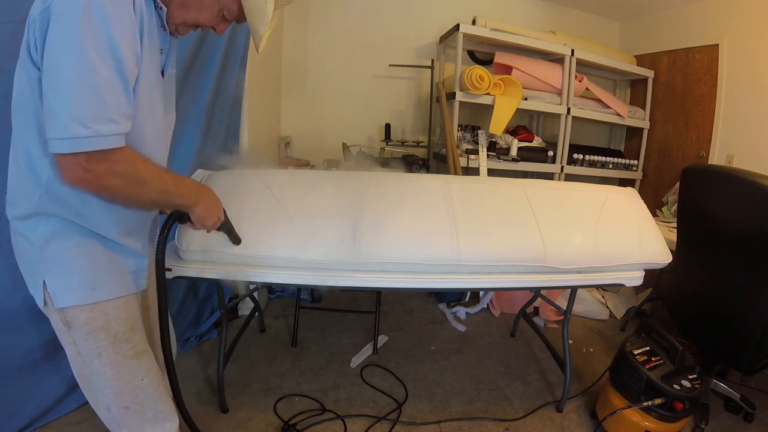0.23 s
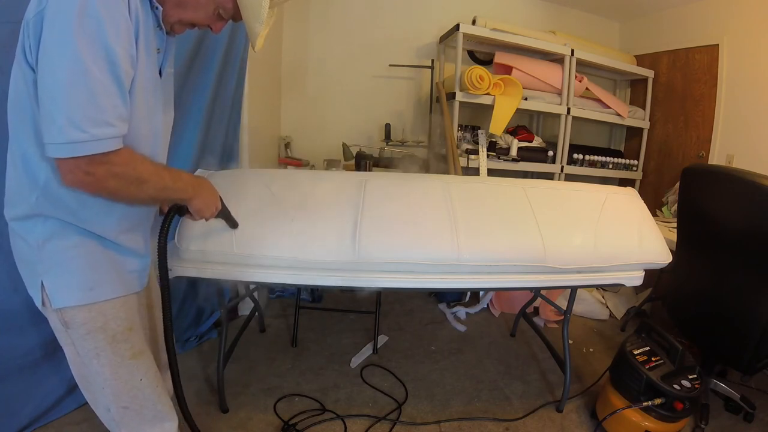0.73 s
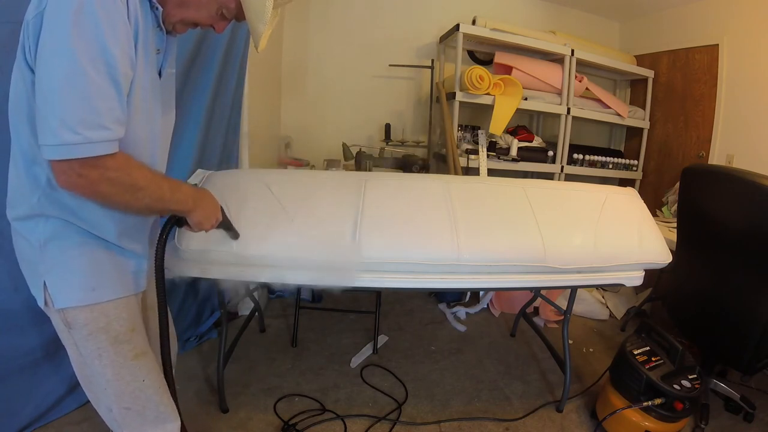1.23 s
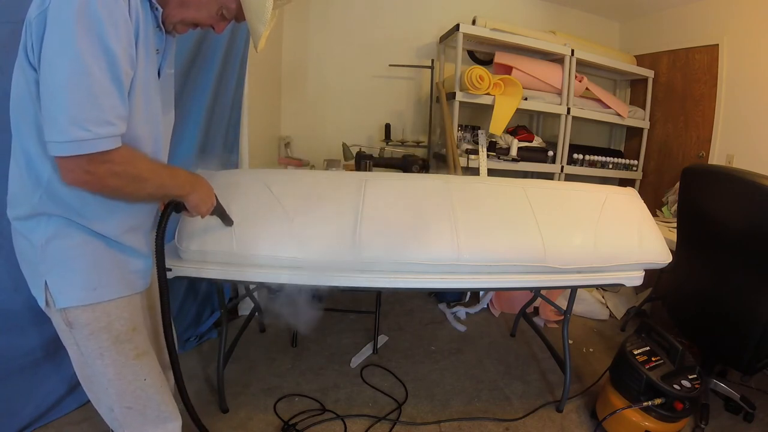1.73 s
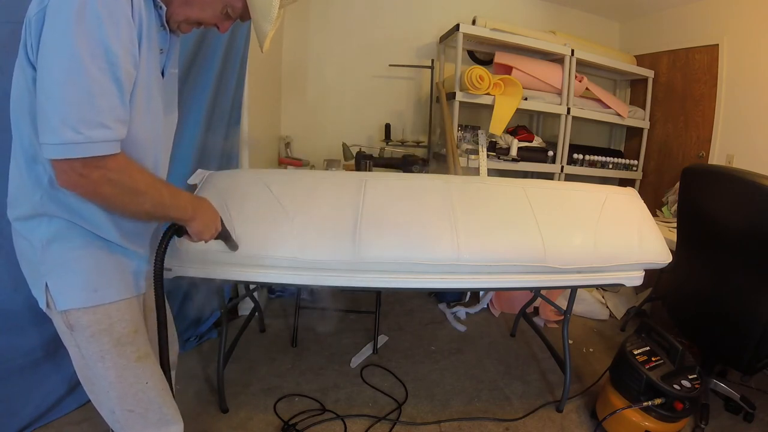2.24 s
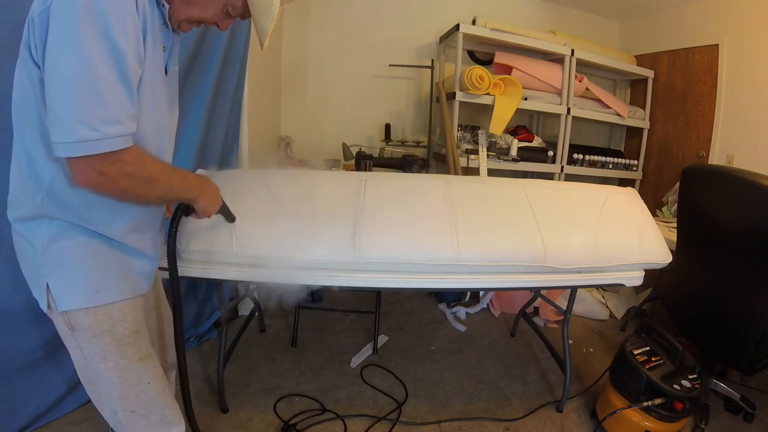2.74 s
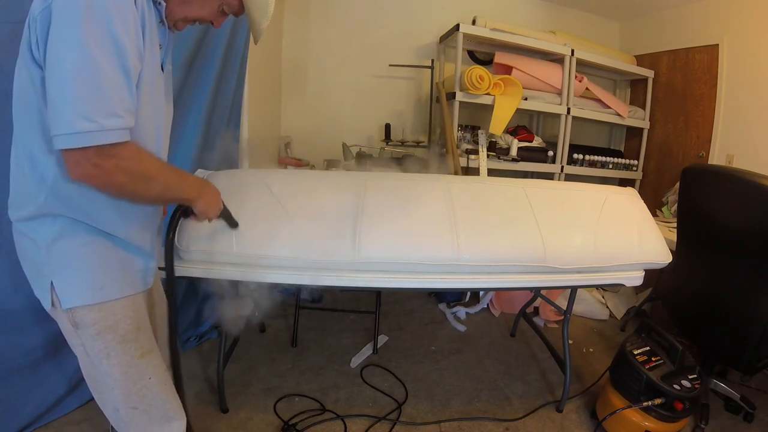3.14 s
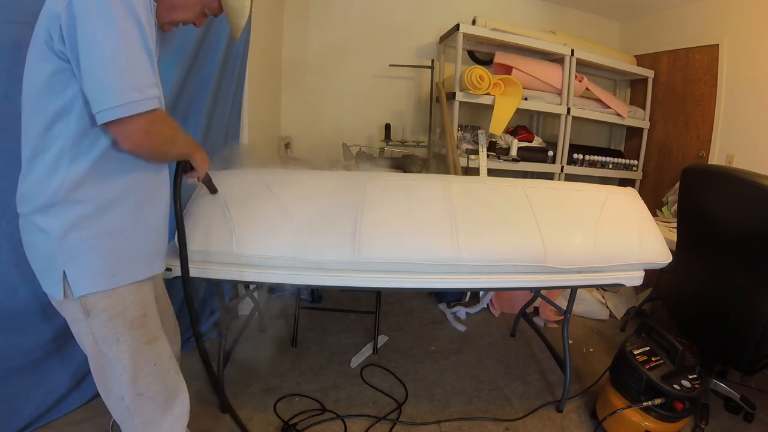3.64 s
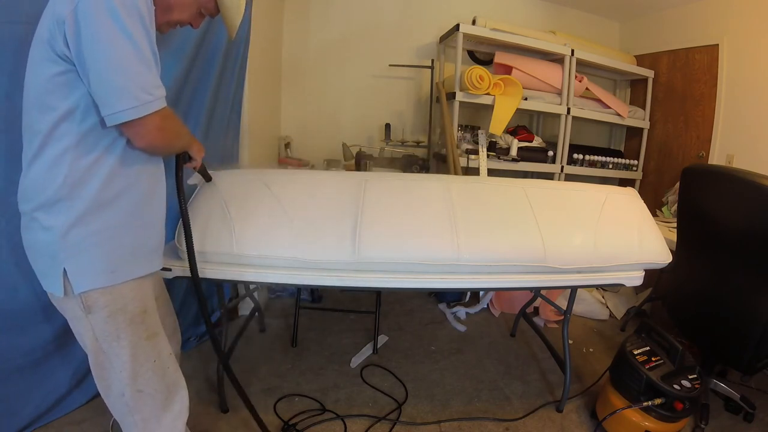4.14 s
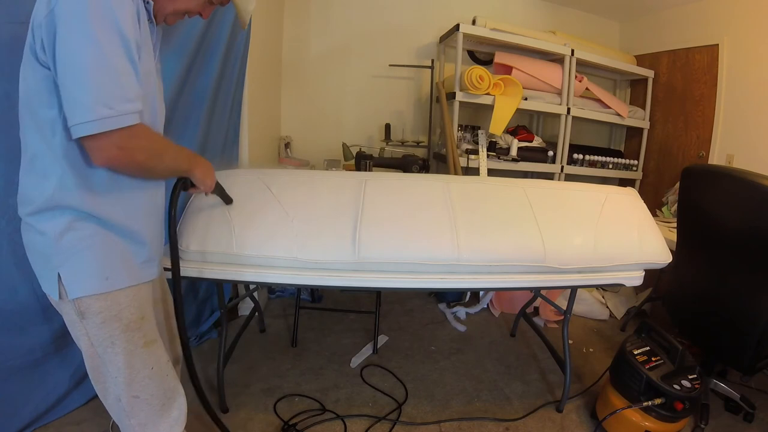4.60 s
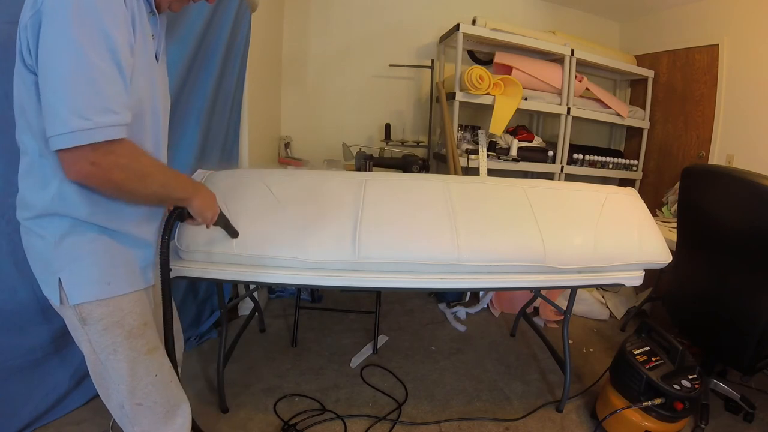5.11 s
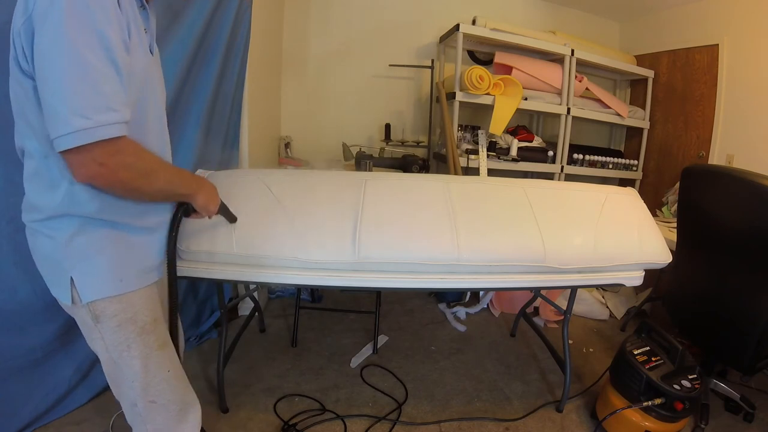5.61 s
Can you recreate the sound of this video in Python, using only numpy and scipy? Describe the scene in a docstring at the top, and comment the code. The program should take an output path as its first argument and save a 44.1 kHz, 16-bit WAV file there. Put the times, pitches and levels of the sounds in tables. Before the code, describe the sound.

A handheld steam wand hisses over a vinyl cushion for the whole six seconds. The hiss is bright and fizzy, with a breathy, whistle-like ring that wavers slightly in pitch as the nozzle tilts. It swells and sinks a few times a second as the hand moves. Short, hollow puffs of spray mark the jet striking squarely, clearest around 0.1, 0.8, 1.4, 2.6, 2.9 and 3.2 seconds. The steam dips briefly near 0.3, 0.6 and 2 seconds. From about 4 to 4.9 seconds it is softer, with a thin sizzle, then surges with another puff at 5.1, dips at 5.4 and rises again at the end. A low room rumble and a faint, wavering machine hum lie underneath throughout. The sound is mono, from one microphone in a small workshop with very short echoes.

```python
"""A steam wand sweeps over a vinyl cushion in a small workshop, heard by one microphone.
The turbulent jet hisses, rings in the gap between nozzle and vinyl, and roars where it strikes;
all three shift as the hand moves. Nearby surfaces send short echoes to the microphone,
and behind the steam lie the low rumble of the room and the hum of a machine."""
import sys
import numpy as np
from scipy import signal
from scipy.fft import rfft, irfft
from scipy.io import wavfile
from scipy.ndimage import uniform_filter1d

SR = 44100
rng = np.random.default_rng(int(sys.argv[2]) if len(sys.argv) > 2 else 0)


def master(y):
    """Save y as 16-bit WAV."""
    cut = np.clip(np.atleast_2d(y).T, -1, 1)
    pcm = np.round(cut * 32767)  # scale
    wavfile.write(sys.argv[1], SR, pcm.astype(np.int16))


N = 258558
SIZE, HOP = 512, 128  # samples in a frame, and between frames
HZ = np.fft.rfftfreq(SIZE, 1 / SR)
FRAME_S = np.arange(N // HOP + 5) * HOP / SR

# room tone at the microphone: f/Hz, relative level/dB
RUMBLE_COLOUR = [(10, -3.5), (25, -1), (45, -2), (65, -7), (120, -13.5), (250, -14), (600, -22),
                 (2000, -43), (12000, -29.5)]
# a machine humming in the background: t/s, relative level/dB
HUM_LEVEL = [(0.0, -48.5), (0.26, -61), (0.31, -44.5), (0.65, -58.5), (1.08, -48), (1.57, -58.5),
             (2.12, -49.5), (2.19, -57.5), (3.87, -48), (4.39, -59), (4.65, -49.5), (5.48, -56.5),
             (5.52, -52), (5.86, -57)]
# echoes off nearby surfaces: delay/s, gain against the direct sound
ECHOES = [(.00093, 0.056), (.0034, 0.1), (.0067, 0.093), (.0094, 0.056), (.0100, 0.065), (0.0145, 0.038)]
# the jet swells and sinks as the wand is rubbed to and fro: t/s, flow/dB, gap ring/dB
WAND_STROKES = [(0.0, -29.5, -24.5), (0.16, -29, -28.5), (0.24, -30.5, -37), (0.33, -40.5, -39.5),
                (0.39, -34, -30), (0.47, -28, -29.5), (0.5, -34, -29.5), (0.55, -31, -30),
                (0.65, -40.5, -40.5), (0.68, -39, -38), (0.73, -32.5, -25), (0.86, -27.5, -28),
                (0.98, -32, -34), (1.03, -39.5, -40), (1.08, -33.5, -29.5), (1.21, -35, -34),
                (1.29, -32, -28), (1.34, -35.5, -33), (1.42, -28.5, -32), (1.47, -29.5, -33),
                (1.52, -25.5, -28.5), (1.6, -35.5, -33), (1.65, -33, -27.5), (1.71, -32, -33),
                (1.88, -32.5, -28.5), (1.99, -39.5, -48), (2.09, -45, -49), (2.12, -38, -36),
                (2.17, -37, -35.5), (2.22, -41.5, -47), (2.28, -41, -47), (2.33, -35.5, -35),
                (2.45, -29, -27.5), (2.55, -32.5, -32), (2.69, -27.5, -28), (2.81, -34, -29.5),
                (2.99, -29.5, -31), (3.05, -40.5, -45), (3.1, -35.5, -30), (3.15, -34.5, -40),
                (3.26, -26.5, -28), (3.38, -33.5, -28), (3.43, -30.5, -33), (3.49, -36.5, -32),
                (3.74, -32, -30.5), (3.83, -34, -34.5), (3.93, -39, -34.5), (3.98, -35.5, -33),
                (4.11, -38, -40.5), (4.29, -40.5, -36), (4.96, -39, -31), (5.07, -31, -26.5),
                (5.19, -33, -32.5), (5.27, -35, -28.5), (5.3, -37, -33.5), (5.45, -39.5, -40),
                (5.58, -36.5, -27.5), (5.66, -37, -31), (5.81, -31, -27), (5.86, -33.5, -28)]
# pitch of the gap, which falls as the nozzle tilts away from the vinyl: t/s, f/Hz
GAP_PITCH = [(0.0, 3120), (0.15, 2950), (0.23, 3240), (0.85, 3060), (0.93, 3270), (1.84, 3020),
             (2.02, 3270), (3.34, 3120), (3.48, 2860), (4.11, 3350), (4.62, 3200), (4.9, 2830),
             (4.99, 3100), (5.17, 2960), (5.24, 3320), (5.43, 3300), (5.56, 3020), (5.86, 3040)]
# how well the nozzle radiates the gap ring: f/Hz, gain/dB
NOZZLE_RESPONSE = [(2000, -3.5), (3000, 0), (3550, 0.5), (3800, -0.5), (4500, 1)]
# spectra of the steam's hiss, top fizz, spray and low puff: f/Hz, relative level/dB
HISS_COLOUR = [(1500, -23), (2600, -7), (4100, 1), (4700, 0.5), (5500, -.5), (6500, -3.5), (7500, -2.5),
               (9000, -4.5), (10500, -8), (13000, -23.5)]
FIZZ_COLOUR = [(6000, -19), (9000, -4), (10500, 0.5), (12000, -0.5), (13200, -11), (15000, -15),
               (16000, -2.5)]
SPRAY_COLOUR = [(700, -67), (1300, -1), (1700, -5), (2050, -3), (2400, 0), (2700, 3), (3300, -12),
                (5000, -35)]
PUFF_COLOUR = [(60, -43), (170, -4), (330, -5.5), (450, 2), (580, 3.5), (750, -3.5), (1100, -8.5),
               (2000, -12)]
# top fizz and thin sizzle against the rest of the jet: t/s, gain/dB
FIZZ_LIFT = [(0.0, 1), (0.78, -2), (0.96, 2.5), (1.35, -0.5), (1.48, 5.5), (1.6, -9), (1.86, -2), (2.05, 8),
             (2.22, -5), (2.36, 1.5), (2.58, -1.5), (2.67, 2), (2.818, 0), (4.85, 0), (5.07, 2), (5.4, 2),
             (5.61, 0), (5.86, 5.5)]
SIZZLE_LIFT = [(0.0, 2), (0.36, -5.0), (0.84, -0.5), (2.61, -12), (2.67, 0.5), (3.0, -1), (3.09, -10.5),
               (3.301, 1.5), (3.96, 5.5), (4.44, 9.5), (5.22, 0.5), (5.4, 9), (5.612, -1), (5.86, 2)]
# how each named part follows the wand:
# base level/dB, slope with flow/(dB/dB), with ring/(dB/dB), with fall of gap pitch/(dB/kHz)
PART_RESPONSE = {"hiss": (-36, 1.0, 0.01, 1.5), "fizz": (-41.5, 1.29, 0.09, -8),
                 "sizzle": (-43.5, 1.35, 0.34, 0), "spray": (-41, 0.32, 0.28, 9.5),
                 "roar": (-43.5, -0.02, 0.4, 5.5), "puff": (-47, 0.75, -0.34, -7)}
# the jet hits the cushion squarely: t/s, length/s, roar/dB, puff/dB, spray/dB
BLASTS = [(0.097, 0.059, -38.5, -36, -45), (0.213, 0.053, -40.5, -34.5, -50), (0.508, 0.027, -41, -41, -40),
          (0.715, 0.012, -37, -46, -35), (0.829, 0.082, -36, -37.5, -33), (1.1, 0.15, -41, -70, -44),
          (1.388, 0.055, -35, -36.5, -35.5), (1.625, 0.03, -37.5, -42, -46), (1.729, 0.17, -38.5, -54, -39),
          (2.107, 0.053, -47, -47, -42), (2.33, 0.093, -42.5, -59, -42), (2.586, 0.085, -41.5, -43, -33.5),
          (2.912, 0.098, -40.5, -37.5, -37.5), (3.183, 0.04, -31.5, -33.5, -35),
          (3.532, 0.07, -61, -45, -36), (5.084, 0.043, -34, -34.5, -40)]
# the nozzle presses into the vinyl: t/s, length/s, gain/dB
CHOKES = [(0.607, 0.082, -6), (1.98, 0.09, -0.5), (4.046, 0.27, -3), (5.388, 0.074, -2.5)]
# the wand held upright at its usual strength
USUAL_FLOW_DB, USUAL_RING_DB, UPRIGHT_HZ = -34.5, -33, 3190


def gain_of(db):
    """Decibels to amplitude."""
    return 10 ** (np.asarray(db) / 20)


def unit_rms(x):
    """Scales to rms 1."""
    return x / np.sqrt(np.mean(x ** 2) + 1e-20)


def unit_power(spectrum):
    """Scales a spectrum so that noise of this shape has rms 1."""
    return spectrum / np.sqrt(np.mean(spectrum ** 2, axis=-1, keepdims=True))


def colour(points, hz=HZ):
    """A spectrum of unit power through the points, joined on a log-frequency axis."""
    f, db = np.transpose(points)
    return unit_power(gain_of(np.interp(np.log(hz + 1), np.log(f + 1), db)))


def curve(rows, column=1):
    """One column of a time table at every frame."""
    columns = np.transpose(rows)
    return np.interp(FRAME_S, columns[0], columns[column])[:, None]


def resonance(hz, width_hz, steep):
    """A broad peak of unit power."""
    return unit_power((1 + (2 * (HZ - hz) / width_hz) ** 4) ** (-steep / 4))


def wander(count, rate, corner_hz):
    """Slow random drift of rms 1, sampled at the given rate."""
    f = np.fft.rfftfreq(count, 1 / rate)
    spectrum = rfft(rng.standard_normal(count)) / (1 + (f / corner_hz) ** 2)
    return unit_rms(irfft(spectrum, count))


def shaped_noise(field):
    """White noise through a gain field of frames x bins."""
    noise = signal.stft(rng.standard_normal(N), nperseg=SIZE, noverlap=SIZE - HOP)[2]
    coloured = noise * field[:noise.shape[1]].T
    return signal.istft(coloured, nperseg=SIZE, noverlap=SIZE - HOP)[1][:N]


def room_rumble(level_db):
    """Room tone: steady, low noise behind everything else."""
    spectrum = rfft(rng.standard_normal(N)) * colour(RUMBLE_COLOUR, np.fft.rfftfreq(N, 1 / SR))
    return gain_of(level_db) * unit_rms(irfft(spectrum, N))


def machine_hum(pitch_hz, trim_db):
    """A machine in the room hums one low tone that wavers in pitch and level."""
    hz = pitch_hz + 1.207 * wander(N, SR, corner_hz=3.22)
    level_db = np.interp(np.arange(N) / SR, *np.transpose(HUM_LEVEL))
    waver_db = 1.5 * wander(N, SR, corner_hz=7.1)
    tone = unit_rms(np.sin(2 * np.pi * np.cumsum(hz) / SR))
    return gain_of(level_db + waver_db + trim_db) * tone


def workshop(direct, t60_s, tail_db):
    """Table, floor and wall echo to the microphone, then a short tail; the overall level is kept."""
    t = np.arange(SR // 3) / SR
    decay = gain_of(-60 * t / t60_s) * (t > .004)
    tails = rng.standard_normal((4, len(t))) * decay
    tails /= np.linalg.norm(tails, axis=1, keepdims=True)
    # as the wand moves, each path through the room carries a drifting share of the sound
    shares = np.array([1 + 2.6 * wander(N, SR, corner_hz=1.2) for _ in tails])
    shares /= np.linalg.norm(shares, axis=0)
    late = signal.fftconvolve(shares * direct, tails, axes=1)[:, :N].sum(axis=0)
    early = sum(gain * np.pad(direct, (round(delay * SR), 0))[:N] for delay, gain in ECHOES)
    return np.std(direct) * unit_rms(direct + early + gain_of(tail_db) * late)


def flutter(depth_db, corner_hz):
    """Gain of a turbulent flow, frame by frame."""
    return gain_of(depth_db * wander(len(FRAME_S), SR / HOP, corner_hz))[:, None]


def eddies(depth_db, frames):
    """Eddies in the stream: brief random patches of gain, some hundred Hz wide."""
    patches = rng.standard_normal((len(FRAME_S), len(HZ)))
    patches = uniform_filter1d(patches, size=frames, axis=0)
    patches = uniform_filter1d(patches, size=7, axis=1)
    return gain_of(depth_db * unit_rms(patches))


def choke(edge_s):
    """Gain of the steam escaping along the vinyl, which dips as the nozzle presses in."""
    dips_db = [db * np.interp(FRAME_S, [t - edge_s, t, t + length, t + length + edge_s], [0, 1, 1, 0])
               for t, length, db in CHOKES]
    return gain_of(sum(dips_db))[:, None]


def blasts(attack_s, release_s):
    """Gains of roar, puff and spray in square hits: each rises quickly, holds and dies away."""
    gains = np.zeros((3, len(FRAME_S)))
    for start, length, *levels_db in BLASTS:
        t = FRAME_S - start
        rise = np.clip(1 + t / attack_s, 0, 1)
        fall = np.exp(-np.maximum(t - length, 0) / release_s)
        gains += np.outer(gain_of(levels_db), rise * fall)
    return gains[..., None]


def struck_cushion(gain):
    """Spectra of steam striking vinyl: a wide spray, a drifting hollow roar and a low puff."""
    blast_roar, blast_puff, blast_spray = blasts(attack_s=0.013, release_s=0.024)
    escape = choke(edge_s=0.022)
    spray = np.hypot(escape * gain["spray"], blast_spray) * colour(SPRAY_COLOUR)
    puff = np.hypot(escape * gain["puff"], blast_puff) * colour(PUFF_COLOUR)
    hollow_hz = 965 + 59.4 * wander(len(FRAME_S), SR / HOP, corner_hz=6.6)[:, None]
    hollow = resonance(hollow_hz, width_hz=323, steep=1.34)
    roar = np.hypot(escape * gain["roar"], blast_roar) * hollow
    return spray, roar * flutter(depth_db=0.75, corner_hz=17), puff


def gap_ring(ring_db, gap_hz, fall_khz, extra_flow_db):
    """Spectrum of the nozzle gap: lower and wider as the nozzle tilts, purer in a gentle flow."""
    width_hz = np.maximum(845 + 360 * fall_khz + 7 * extra_flow_db, 200)
    radiated = unit_power(resonance(gap_hz, width_hz, steep=1.9) * colour(NOZZLE_RESPONSE))
    return gain_of(ring_db + 0.04) * radiated * flutter(depth_db=0.92, corner_hz=25)


def free_jet(gain):
    """Spectra of the turbulent stream itself: a broad hiss, a top fizz and a thin sizzle."""
    hiss = gain["hiss"] * colour(HISS_COLOUR)
    fizz = gain["fizz"] * gain_of(curve(FIZZ_LIFT)) * colour(FIZZ_COLOUR)
    sizzle = gain["sizzle"] * gain_of(curve(SIZZLE_LIFT)) * resonance(hz=8230, width_hz=860, steep=0.91)
    return hiss, fizz, sizzle


def steam_wand():
    """Turbulent steam takes the colour of the free jet, the struck cushion and the nozzle gap."""
    flow_db, ring_db = curve(WAND_STROKES, column=1), curve(WAND_STROKES, column=2)
    extra_flow_db, extra_ring_db = flow_db - USUAL_FLOW_DB, ring_db - USUAL_RING_DB
    gap_hz = curve(GAP_PITCH)
    fall_khz = (UPRIGHT_HZ - gap_hz) / 1000
    # a stronger flow is brighter; a tilted nozzle trades top fizz for a wide spray along the vinyl
    gain = {name: gain_of(db + by_flow * extra_flow_db + by_ring * extra_ring_db + by_tilt * fall_khz)
            for name, (db, by_flow, by_ring, by_tilt) in PART_RESPONSE.items()}
    parts = [*free_jet(gain), *struck_cushion(gain), gap_ring(ring_db, gap_hz, fall_khz, extra_flow_db)]
    field = np.sqrt(sum(part ** 2 for part in parts))
    # the whole stream sputters together
    sputter = flutter(depth_db=0.74, corner_hz=38.8) * eddies(depth_db=1.13, frames=14)
    return shaped_noise(field * sputter)


def scene():
    """The wand in the workshop, over rumble and hum; one microphone feeds both channels."""
    steam = workshop(steam_wand(), t60_s=0.14, tail_db=-6.5)
    mono = steam + room_rumble(level_db=-46.5) + machine_hum(pitch_hz=85.6, trim_db=-1.0)
    return np.array([mono, mono])


def record(dry):
    """The recorder cuts the treble above 15.3 kHz."""
    lowpass = signal.firwin(511, 15300, window=("kaiser", 9), fs=SR)
    return signal.oaconvolve(dry, lowpass[None], "same")


dry = scene()
out = record(dry)
master(out)
```